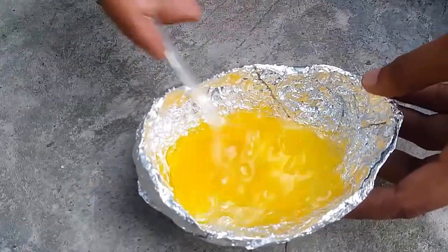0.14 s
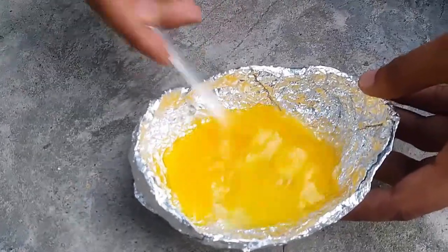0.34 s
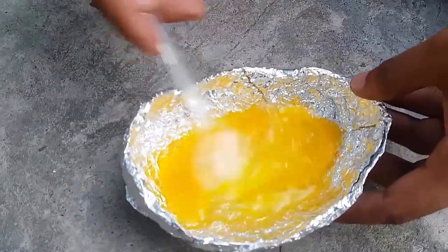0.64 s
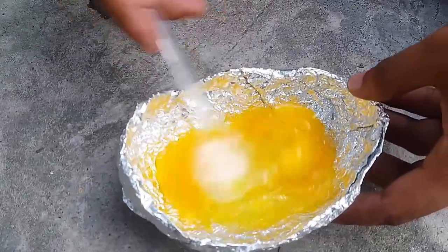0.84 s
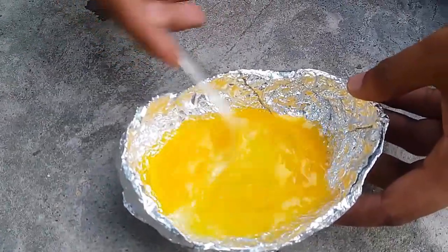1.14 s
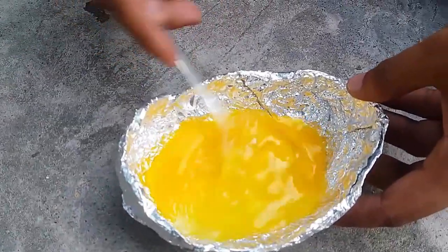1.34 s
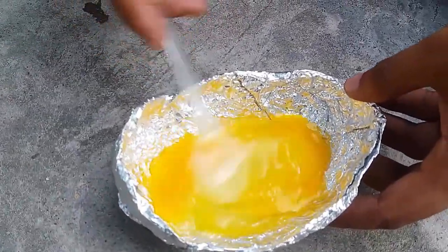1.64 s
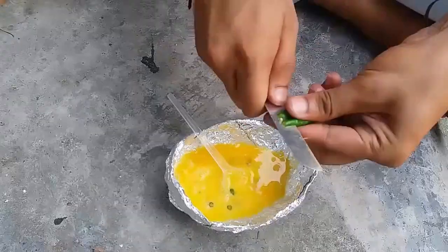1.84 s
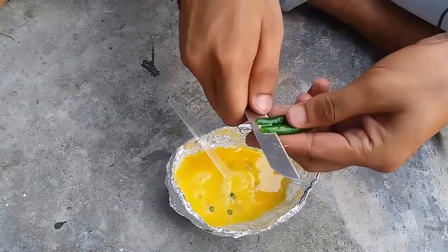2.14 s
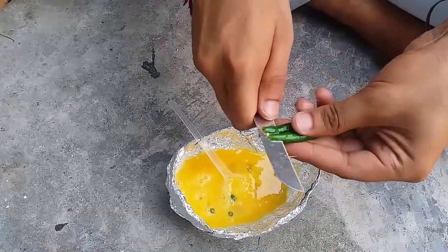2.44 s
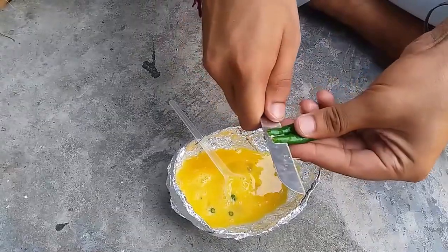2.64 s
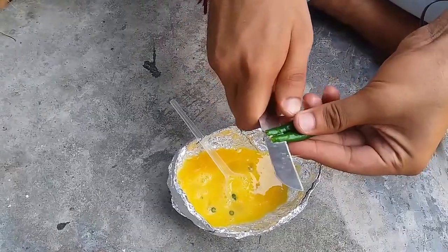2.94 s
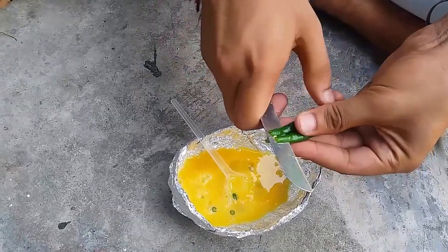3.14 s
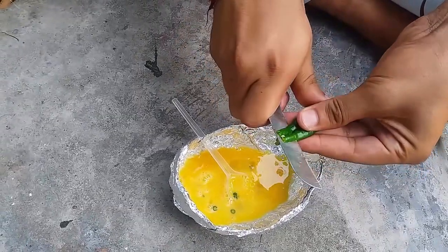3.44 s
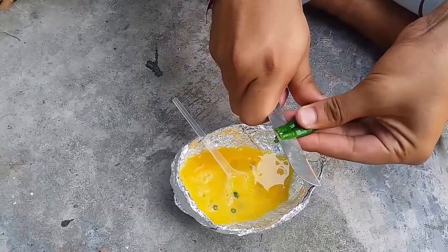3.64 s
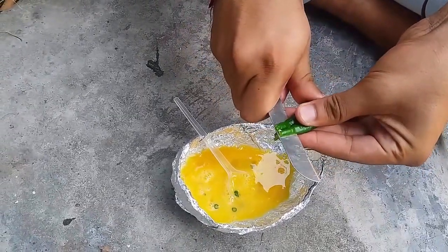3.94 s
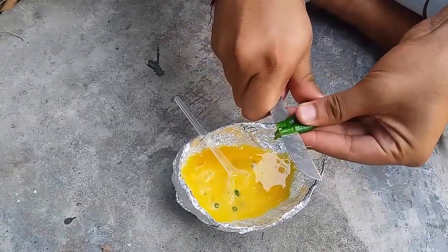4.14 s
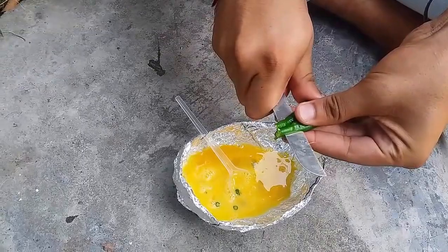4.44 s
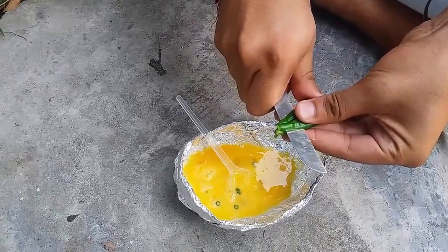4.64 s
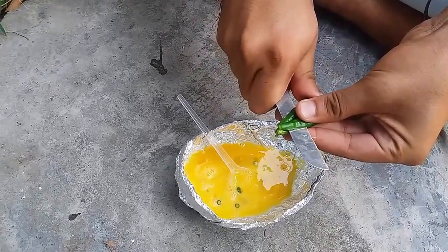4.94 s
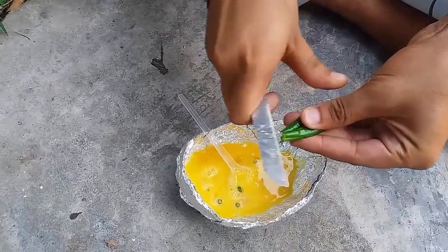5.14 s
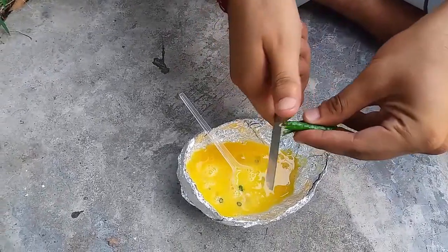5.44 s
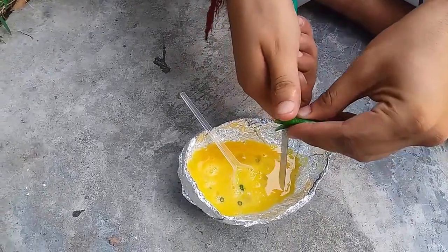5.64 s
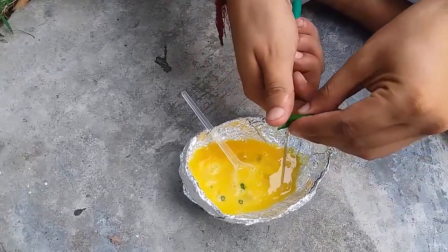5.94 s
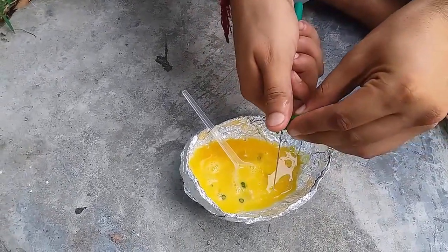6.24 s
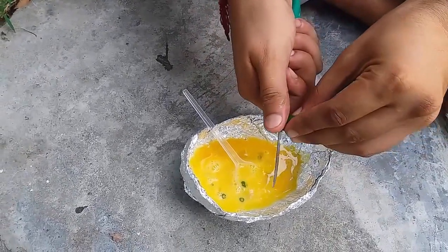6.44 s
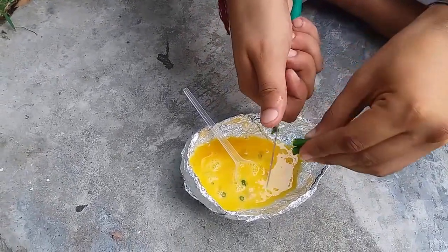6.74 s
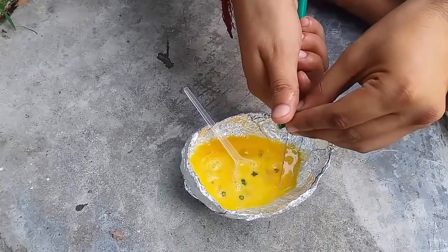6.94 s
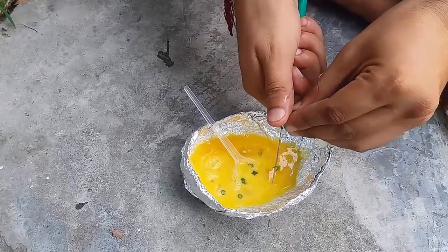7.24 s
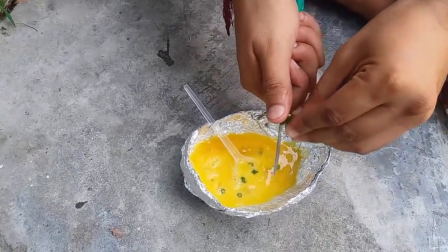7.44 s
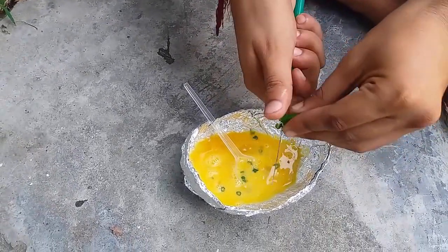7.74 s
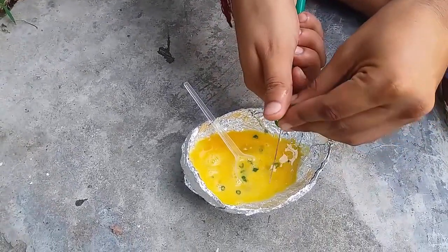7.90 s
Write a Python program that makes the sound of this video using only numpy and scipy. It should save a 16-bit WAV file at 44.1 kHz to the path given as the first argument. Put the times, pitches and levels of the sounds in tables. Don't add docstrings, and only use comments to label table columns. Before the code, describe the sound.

A plastic fork beats eggs in a crinkly foil bowl, drops with a sharp clatter, then faint knife snips over quiet outdoor birds and engine thump.

```python
import sys
import numpy as np
from scipy import signal
from scipy.io import wavfile
from scipy.ndimage import uniform_filter1d

SR = 44100
rng = np.random.default_rng(int(sys.argv[2]) if len(sys.argv) > 2 else 0)


def invert_db(x):
    u = np.asarray(x, float) / 20
    return 10 ** u


def wav_record(signal):
    frames = np.transpose(np.atleast_2d(signal))
    bounded = np.clip(frames, -1, 1)
    quanta = np.round(bounded * 32767).astype(np.int16)
    wavfile.write(sys.argv[1], SR, quanta)


N = 355887

# hz, level_db (per Hz)
WET_FOIL = [(1470, -42.5), (2600, 1), (3700, -2.5), (5270, 3), (6400, -3.5), (8000, -7), (11500, -17.5),
            (16000, -26)]
# hz, level_db (per Hz)
BLADE_COLOUR = [(1470, -43), (2500, -11.5), (4200, -10), (6010, -6.5), (8940, -15), (13200, -19.5),
                (16000, -24)]


def evened(x):
    return x / np.sqrt(np.mean(x ** 2) + 1e-20)


def read(points, hz):
    f, value = np.transpose(points)
    return np.interp(np.log(hz + 1), np.log(f + 1), value)


def add(mix, s, sound):
    part = mix[round(s * SR):][:len(sound)]
    part += sound[:len(part)]


def drift(per_s, size=N):
    knots = rng.standard_normal(size // 64 + 2)
    smooth = signal.lfilter([1], [1, -np.exp(-2 * np.pi * per_s * 64 / SR)], knots)
    smooth = uniform_filter1d(smooth, size=5)
    return evened(np.interp(np.arange(size) / 64, np.arange(len(knots)), smooth))


def band(hz, width, size=N):
    sos = signal.butter(3, [hz - width / 2, hz + width / 2], "band", fs=SR, output="sos")
    return evened(signal.sosfilt(sos, rng.standard_normal(size)))


def resonate(x, hz, width):
    turn = np.exp(2j * np.pi * hz * np.arange(len(x)) / SR)
    r = np.exp(-np.pi * width / SR)
    return 2 * (turn * signal.lfilter([1 - r], [1, -r], x / turn)).real


def causal(points):
    gain = np.log(invert_db(read(points, abs(np.fft.fftfreq(2048, 1 / SR)))))
    return np.fft.ifft(np.exp(np.conj(signal.hilbert(gain)))).real[:1024]


def echoes(x, t60, wet_db):
    t = np.arange(SR // 2) / SR
    taps = rng.choice([-1., 1.], len(t)) * (rng.random(len(t)) < .05)
    taps = taps * invert_db(-60 * t / t60)
    return x + invert_db(wet_db) * signal.fftconvolve(x, taps / np.linalg.norm(taps))[:N]


def bend(length, hz, ends, at=.5):
    u = np.linspace(0, 1, int(length * SR)) ** (np.log(.5) / np.log(at))
    curve = np.polyfit([0, .5, 1], [ends[0], 1, ends[1]], deg=2)
    return hz * np.polyval(curve, u)


def whistle(length, hz, db, ends):
    hz = bend(length, hz, ends)
    hz = hz * (1 + .009 * drift(50, size=len(hz)))
    hoarse = .95 + .4 * band(160, 280, size=len(hz))
    flutter = invert_db(db + 2 * drift(50, size=len(hz))) * hoarse
    return flutter * np.sin(2 * np.pi * np.cumsum(hz) / SR) * signal.windows.tukey(len(hz), .6)


def crackle(rows, colour, ring, ring_width, tail_db, tail_s, rise=0.22):
    out, t, body = np.zeros(N), np.arange(3000) / SR, causal(colour)
    dull = signal.butter(2, [600, 3000], "band", fs=SR, output="sos")
    draws = rng.standard_normal((len(rows), 2, len(t)))
    for (s, db, hz, dull_db, length), (grain, clumps) in zip(rows, draws):
        length = np.clip(length, .0003, .03)
        clump_db = 4.8 * np.minimum(t / (0.26 * length), 1)
        snaps = grain * invert_db(clump_db * evened(uniform_filter1d(clumps, size=30)))
        snaps *= np.minimum(t / (rise * length), 1)
        snaps *= np.exp(-t / length) + invert_db(tail_db) * np.exp(-t / tail_s)
        sheet = signal.fftconvolve(snaps, body)[:len(t)]
        bright = evened(sheet) + ring * evened(resonate(sheet, hz, ring_width))
        thud = signal.sosfilt(dull, snaps)
        add(out, s, invert_db(db) * (bright / abs(bright).max() + invert_db(dull_db) * thud / abs(thud).max()))
    return out


def short_rings(rows, climb):
    out, t = np.zeros(N), np.arange(4000) / SR
    for s, db, hz, t60 in rows:
        ring = np.sin(2 * np.pi * hz * (t + climb * t ** 2))
        ring = ring * (1 + .2 * band(300, 500, size=len(t)))
        add(out, s, invert_db(db - 60 * t / max(t60, .003)) * np.minimum(t / 0.00089, 1) * ring)
    return out


def air():
    # hz, level_db (per Hz)
    air_colour = [(20, -35), (36, -35), (48, -4.5), (108, -3), (182, -7), (266, -11), (650, -22),
                  (1300, -28.5), (2100, -28.5), (3600, -31.5), (6400, -36), (9000, -36.5), (15700, -40),
                  (16000, -58)]
    # start_s, level_db
    swell = [
        (0.0, -60),
        (4.23, -63.5),
        (8.07, -59.5),
    ]
    frames, hz = N // 512 + 5, np.fft.rfftfreq(2048, 1 / SR)
    a, b, patches = rng.standard_normal((frames, 1025, 3)).T
    patches = uniform_filter1d(patches, size=20, axis=0)
    patches = evened(uniform_filter1d(patches, size=8, axis=1))
    s, db = np.transpose(swell)
    swell_db = np.interp(np.arange(frames) * 512 / SR, s, db - db.mean())
    traffic_share = np.exp(-np.log((hz + 1) / 600) ** 2 / 3.8)[:, None]
    level_db = read(air_colour, hz)[:, None] + 1.18 * patches + traffic_share * swell_db
    wash = signal.istft((a + 1j * b) * invert_db(level_db), nperseg=2048, noverlap=1536)[1][:N]
    return invert_db(-53.5) * evened(wash)


def engine():
    # order, level_db
    orders = [(4, -78.5), (5, -77), (6, -73), (7, -61.5), (8, -56), (9, -61.5), (10, -62.5), (11, -57.5),
              (12, -69.5), (13, -65.5), (14, -61.5), (15, -63.5), (16, -61), (17, -68.5), (19, -70.5)]
    turns = np.cumsum(11.45 * (1 + 0.0021 * drift(0.25))) / SR
    lag = np.pi / 2
    out = np.zeros(N)
    for k, db in orders:
        waver = 0.98 * drift(0.58)
        level = np.sqrt(2) * invert_db(db + 1.26 * drift(3.2))
        out += level * np.cos(2 * np.pi * k * turns + lag * (k % 2) + waver)
    return out


def chorus():
    # start_s, insects_db, birds_db
    busy = [(0, -65, -60), (.43, -66, -67), (.85, -71, -64), (1.24, -59, -63), (1.57, -60, -66),
            (1.89, -67, -67.5), (2.3, -69, -71), (2.95, -63.5, -67.5), (3.3, -75, -73.5), (3.7, -61, -66),
            (4.14, -67, -65), (4.6, -62, -70), (5.03, -65, -75), (5.4, -58, -66), (5.75, -64, -73),
            (6.8, -65, -70), (7.3, -63.5, -78), (8.07, -66, -69)]
    # start_s, level_db
    high_insects = [(0.0, -79), (0.83, -78), (1.24, -74), (1.64, -68), (2.27, -77), (2.9, -67), (3.14, -77),
                    (3.42, -77), (3.73, -68), (4.2, -72), (4.7, -66), (5.17, -72), (6.36, -72), (6.68, -68),
                    (7.08, -73), (7.42, -74), (7.57, -67), (8.07, -74)]
    # centre_hz, width_hz
    bands = [(5050, 1080), (7550, 500), (3050, 440)]
    t, (s, insects_db, birds_db) = np.arange(N) / SR, np.transpose(busy)
    insects_db, birds_db = np.interp(t, s, insects_db), np.interp(t, s, birds_db)
    high_db = np.interp(t, *np.transpose(high_insects)) - 2.5
    out = np.zeros(N)
    for db, (hz, width) in zip((insects_db, high_db, birds_db), bands):
        for place in (-1, 0, 1):
            strand = band(hz + place * width * .4, width * .45)
            out += strand * invert_db(db - 3.5 - 4 * abs(place) + 2.4 * drift(10))
    return out


def songbirds():
    # start_s, length_s, middle_hz, level_db
    held = [(0, .025, 2365, -51), (.065, .045, 3230, -54), (2.238, 0.045, 1490, -66),
            (2.478, 0.072, 3040, -57), (4.074, 0.082, 3020, -51.5), (4.25, 0.089, 2838, -53.5),
            (5.09, 0.23, 2930, -62), (5.3, .15, 2900, -66.5), (5.03, 0.036, 3000, -60),
            (1.34, .04, 3050, -61), (7.91, .1, 3150, -62), (2.92, .12, 3060, -65), (3.04, .04, 3430, -65),
            (4.6, .06, 2856, -62.5), (5.88, 0.11, 2980, -65), (5.83, 0.08, 3150, -57),
            (5.72, .1, 3050, -63), (.08, .02, 3200, -53), (5.849, 0.06, 1490, -58), (6.86, 0.057, 266, -51),
            (6.948, 0.036, 2780, -63), (6.17, .08, 1290, -70), (7.07, 0.2, 1945, -69.5),
            (7.7, 0.28, 1580, -69.5), (1.83, .07, 2550, -65)]
    # start_s, length_s, middle_hz, level_db
    rising = [(.259, 0.047, 3110, -51.5), (.91, 0.03, 3100, -58), (2.31, 0.045, 2790, -56),
              (3.76, 0.038, 2740, -55), (3.993, 0.055, 2750, -50.5), (4.235, 0.04, 2400, -57),
              (4.739, 0.091, 2846, -62), (5.062, 0.047, 2645, -54), (7.908, 0.18, 2940, -64)]
    # start_s, length_s, middle_hz, level_db
    falling = [(.472, .087, 2640, -55), (1.116, 0.11, 2860, -56.5), (2.5, .03, 2700, -57),
               (2.639, 0.048, 2480, -56.5), (3.808, 0.053, 2700, -57), (3.918, 0.049, 2974, -51.5),
               (4.092, 0.031, 2330, -58), (4.89, .12, 2430, -63), (5.245, 0.051, 2706, -52.5),
               (5.408, 0.041, 2500, -58.5), (6.49, 0.072, 3150, -65)]
    # start_s, length_s, middle_hz, level_db
    arched = [
        (2.68, 0.069, 2425, -54.5),
        (4.13, 0.072, 2406, -54.5),
        (5.445, 0.084, 2350, -55),
    ]
    shapes = ((held, (1, 1)), (rising, (.9, 1.04)), (falling, (0.98, 0.893)), (arched, (0.8, 0.75)))
    out = np.zeros(N)
    for notes, ends in shapes:
        for s, length, hz, db in notes:
            add(out, s, whistle(length, hz, db, ends))
    return out


def scrape():
    count = int(1.56 * SR)
    t = np.arange(count) / SR
    often = 400 / SR * invert_db(4.4 * drift(20, size=count))
    often = often * invert_db(2.5 * np.cos(2 * np.pi * (t - 0.11) / .195))
    snaps = (rng.random(count) < often) * invert_db(3.6 * rng.standard_normal(count))
    bursts = signal.lfilter([1], [1, -np.exp(-1 / 40)], snaps) * rng.standard_normal(count)
    sound = signal.fftconvolve(bursts, causal(WET_FOIL))
    return np.pad(invert_db(-63.5) * evened(sound), (0, N - len(sound)))


def whisk():
    # start_s, peak_db, crease_hz, dull_db (re peak)
    strikes = [(0.0363, -37.5, 4440, -17), (0.059, -24.5, 8100, -36), (0.1028, -22, 5300, -11.5),
               (0.1278, -34, 4460, -8), (0.305, -29.5, 4900, -18), (0.3139, -28, 6600, -14),
               (0.3178, -28, 4700, -1), (0.446, -32, 7450, -17), (0.4697, -26.5, 5100, -18),
               (0.614, -33.5, 4900, -18), (0.6439, -30.5, 4960, -8), (0.655, -32, 5500, -6),
               (0.6714, -39.5, 4000, 7.5), (0.8355, -33, 7600, -6), (0.8387, -21, 5700, -10.5),
               (0.8705, -27.5, 7000, -4.5), (0.96, -50, 7600, -12), (0.1973, -41, 5600, 5),
               (0.268, -44, 6000, -6), (0.385, -46, 6100, -20), (0.3095, -29, 5600, -17),
               (0.638, -42, 6500, -10), (0.8735, -27, 5300, -8), (1.2225, -25.5, 6500, -14),
               (1.221, -25, 6660, -15), (1.4179, -38, 5050, -9), (1.4253, -23, 5700, -17),
               (7.661, -47, 4600, 8)]
    # start_s, peak_db, crease_hz, dull_db (re peak)
    slides = [(0.033, -49, 5000, 1), (0.098, -30, 6000, -9), (.124, -32.5, 5500, -9),
              (0.106, -33, 5400, -8), (0.113, -36, 7000, 1), (0.139, -40, 4600, -9),
              (0.1927, -45, 5000, -2), (0.334, -41, 5000, -20), (0.504, -44, 5000, -3),
              (0.692, -36.5, 5900, -7), (0.699, -47, 6000, -14), (0.7134, -46, 5600, -4),
              (0.865, -28.5, 6500, -9), (0.882, -49, 5600, 0), (0.893, -36, 5600, -6),
              (0.901, -42, 5600, 2.5), (1.081, -43.5, 5000, -3.5), (1.269, -40.5, 5000, 5),
              (1.28, -35, 5600, -5), (1.289, -38, 6200, -12), (1.431, -29.5, 5500, -8),
              (1.438, -38, 8000, -18), (1.446, -37.5, 5600, -11), (1.459, -35, 5600, -8),
              (1.462, -31, 6100, -13), (1.483, -42, 5400, -8), (1.491, -48, 5000, -3),
              (1.505, -46, 5800, -3)]
    blows = [(*row, 0.0018 * invert_db(-0.045 * (row[1] + 23))) for row in strikes]
    slips = [(*row, 0.0035) for row in slides]
    struck = crackle(blows, WET_FOIL, ring=1.0, ring_width=530, tail_db=-30.5, tail_s=0.02)
    slid = crackle(slips, WET_FOIL, ring=0.74, ring_width=1600, tail_db=-26.5, tail_s=0.054, rise=1.2)
    return struck + slid


def egg_pops():
    # start_s, peak_db, pitch_hz, t60_s
    pockets = [(0.058, -39, 1560, 0.028), (0.08, -44, 1204, 0.042), (0.116, -31, 1770, 0.013),
               (1.037, -35.5, 1600, 0.016), (1.028, -43, 2270, 0.018), (0.131, -44, 1470, 0.076),
               (0.305, -32.5, 1650, 0.054), (0.469, -35.5, 1633, 0.049), (0.555, -44.5, 970, 0.026),
               (0.658, -33, 1850, 0.019), (0.791, -38, 1780, 0.024), (0.841, -20.5, 2370, 0.011),
               (0.866, -44, 1940, 0.04), (1.2252, -24, 1845, 0.02), (1.221, -36, 1700, .03),
               (1.271, -39, 647, 0.042), (1.307, -48, 2120, 0.1), (1.418, -26.5, 1830, 0.017),
               (1.6737, -18.5, 1540, 0.017), (1.674, -31, 710, 0.027), (7.339, -47, 786, 0.032),
               (0.307, -47, 715, 0.026), (0.626, -50, 1400, .02), (0.645, -45, 750, .03),
               (0.868, -44, 696, 0.032), (0.876, -43, 2160, 0.066), (1.236, -43, 2040, 0.046),
               (1.427, -41, 606, 0.023), (1.706, -48, 327, .04), (7.661, -41, 1670, 0.024),
               (1.28, -46, 2920, .03), (1.731, -33, 926, .025), (1.746, -38, 3750, .03)]
    return short_rings(pockets, climb=2)


def crease_rings():
    # start_s, peak_db, pitch_hz, t60_s
    creases = [(.0592, -32, 7900, .017), (.0595, -31, 5400, .02), (.4475, -37, 5000, .02),
               (.325, -44, 3100, .04), (1.2255, -36, 5900, .02), (1.433, -38, 8000, .02),
               (1.4395, -37, 8000, .015), (1.435, -35, 5400, .025), (1.674, -20, 3280, .016),
               (1.674, -12, 5050, .018), (1.6738, -12, 8050, .014), (1.674, -23, 10100, .01),
               (1.7312, -17, 4810, .016), (1.7312, -19, 5710, .014), (1.7312, -22, 3800, .016),
               (1.7312, -27, 8290, .012)]
    return short_rings(creases, climb=0)


def ticks():
    # start_s, peak_db, ring_hz
    snaps = [(.4697, -24.5, 5100), (0.6561, -27.5, 7600), (0.8352, -24.5, 7500), (.8692, -32, 5600),
             (1.0245, -29.5, 5300), (1.0287, -37, 5500), (1.0318, -32, 5600), (1.035, -34, 6000),
             (1.038, -25.5, 6000), (1.041, -37, 5200), (4.31, -24.5, 6300), (4.3122, -26.5, 6200),
             (7.3352, -38, 6000), (7.3397, -30.5, 5960), (7.351, -41, 6000), (7.3555, -41, 8500),
             (7.439, -47, 5500), (7.5097, -27.5, 5760), (.7008, -34, 6000), (.4935, -41, 4800),
             (6.7048, -33.5, 6600), (2.8625, -37, 8000), (7.7295, -39.5, 6000), (6.458, -49, 8000)]
    rows = [(*row, -17.5, 0.00057) for row in snaps]
    return crackle(rows, BLADE_COLOUR, ring=1.0, ring_width=900, tail_db=-23.5, tail_s=0.0052, rise=0.51)


def throbbing_insect():
    # start_s, end_s, beat_offset_rad, level_db
    bouts = [(0.256, 0.64, 3.5, -66.5), (1.096, 1.594, 2.5, -64.5), (2.119, 2.75, -0.1, -65),
             (2.785, 3.06, 1, -68.5), (3.101, 3.576, 1.6, -63.5), (4.946, 5.35, -1, -67),
             (5.639, 6.137, 3.5, -61.5), (6.539, 7.135, 2.5, -62), (7.542, 8.12, 2, -63)]
    t = np.arange(N) / SR
    stumble = .3 * drift(6)
    beats = np.zeros(N)
    for start, end, offset, db in bouts:
        throb_db = 5 * np.cos(2 * np.pi * 13.4 * (t - start) + offset + stumble)
        fade = np.clip(np.minimum(t - start, end - t) / 0.065, 0, 1)
        beats += invert_db(db + throb_db) * fade
    return beats * (band(4620, 480) + .3 * band(5170, 450)) * invert_db(1.8 * drift(3.1))


def rustles():
    # start_s, length_s, centre_hz, width_hz, level_db
    swells = [
        (0.551, 0.23, 79, 40, -53),
        (1.663, 0.21, 373, 400, -63),
        (1.75, 0.2, 2700, 1500, -63),
        (4.3, 0.4, 3400, 1800, -65.5),
        (5.1, .6, 4150, 500, -68),
        (6.223, 0.18, 3300, 1000, -65),
        (7.098, 0.17, 52.5, 29.3, -61),
        (7.447, 0.38, 1920, 900, -66),
        (1.745, .04, 3600, 900, -56),
        (7.891, 0.17, 2540, 1400, -62.5),
    ]
    out = np.zeros(N)
    for s, length, hz, width, db in swells:
        count = int(length * SR)
        grain = invert_db(db + 3 * drift(22, size=count))
        add(out, s, band(hz, width, size=count) * grain * signal.windows.tukey(count, .4))
    return out


def fork_drop():
    # start_s, peak_db, crease_hz, dull_db (re peak), crackle_s
    bounces = [(1.6222, -32.5, 4620, -14, 0.0017), (1.6268, -26, 8200, -17, 0.0014),
               (1.6371, -15, 5650, -15, 0.0014), (1.648, -37, 6600, -17, .004),
               (1.66, -35.5, 5900, -9.5, 0.0059), (1.722, -36, 3400, -10, 0.0033),
               (1.759, -50, 6000, -20, .002), (1.6737, -5.5, 7400, -16, 0.0014),
               (1.6768, -10.5, 5600, -23.5, 0.0015), (1.69, -27, 5200, -29, 0.0087),
               (1.6985, -26, 4700, -34, 0.0012), (1.707, -31, 5000, -21, 0.0079),
               (1.7308, -9.5, 4660, -14, 0.0021), (1.734, -9.5, 4900, -13, 0.00066),
               (1.745, -39, 3500, -34, 0.014)]
    # hz, level_db (per Hz)
    dry_foil = [(410, -45.5), (700, -36), (910, -30), (1150, -14), (3410, -2.5), (3790, -6.5), (5920, -2),
                (7010, -4.5), (8310, -9.5), (16000, -24)]
    return crackle(bounces, dry_foil, ring=1.0, ring_width=860, tail_db=-84, tail_s=0.0097)


def knife_snips():
    # start_s, peak_db, ring_hz
    cuts = [(1.964, -38, 8300), (1.9942, -38.5, 7550), (2.8611, -32, 4740), (3.095, -45.5, 5630),
            (3.5094, -38.5, 7330), (2.0, -41.5, 7000), (3.94, -45, 7400), (4.0677, -44, 5780),
            (4.1186, -36, 7800), (4.162, -37.5, 5930), (4.258, -40, 5800), (4.1473, -44, 7000),
            (1.97, -38, 6000), (4.2874, -46, 5900), (4.3065, -38, 6500), (4.315, -39, 6400),
            (4.321, -35, 6000), (4.33, -45, 7200), (4.338, -41, 7000), (4.343, -47, 6400),
            (4.361, -45, 6600), (4.385, -51, 6000), (4.4606, -47, 7400), (4.6132, -46, 6400),
            (4.6781, -50, 7000), (4.8088, -46, 5900), (4.9, -47, 7200), (5.0542, -45.5, 6500),
            (5.1891, -47, 6100), (6.2886, -41, 6000), (6.6673, -48, 6000), (7.459, -43, 5600),
            (7.4889, -45, 5600), (4.402, -43, 7600), (4.538, -37.5, 5870), (4.584, -43, 5750),
            (4.7488, -39.5, 7560), (4.881, -44, 5780), (5.36, -41, 5800), (6.31, -39, 5800),
            (6.3847, -35.5, 5700), (6.506, -42, 6500), (6.698, -39, 6000), (6.702, -40, 6600),
            (6.7995, -50, 6500), (7.342, -33, 5000), (7.383, -50, 7200), (7.635, -50, 5600),
            (7.951, -52, 6000), (7.4455, -44, 5760), (7.5393, -31.5, 6200)]
    rows = [(*row, -14.5, 0.00124) for row in cuts]
    return crackle(rows, BLADE_COLOUR, ring=1.0, ring_width=1400, tail_db=-27.5, tail_s=0.022, rise=0.85)


def chirps():
    # start_s, level_db
    calls = [(2.05, -56.5), (2.3, -59), (2.409, -57.5), (2.52, -56), (2.7, -56), (3.041, -59), (3.33, -60),
             (3.44, -56), (3.668, -54), (3.942, -54), (4.179, -60), (4.29, -52.5), (4.41, -56.5),
             (6.3, -60), (6.6, -59), (7.7, -56)]
    out, u = np.zeros(N), np.linspace(0, 1, 2400)
    sweep = np.sin(2 * np.pi * np.cumsum(2700 + 1000 * u) / SR)
    for s, db in calls:
        rough = band(537, 1070, size=len(u))
        add(out, s - .015, invert_db(db) * sweep * rough * np.hanning(len(u)))
    return out


def caws():
    # start_s, length_s, top_hz, level_db, squawk_db
    calls = [
        (2.255, .225, 600, -67.5, -59),
        (2.83, .18, 570, -66.5, -56),
        (5.89, .21, 585, -68.5, -57),
    ]
    # hz, level_db
    throat = [(600, -22), (1150, 4.5), (1750, -1), (2300, -19)]
    out, squawk_s = np.zeros(N), 0.0582
    for s, length, top_hz, db, squawk_db in calls:
        hz = bend(length, top_hz, (.92, .88), at=0.33)
        count = len(hz)
        turns = np.cumsum(hz * (1 + 0.0075 * drift(27.5, size=count))) / SR
        voice = sum(invert_db(read(throat, k * hz)) * np.sin(2 * np.pi * k * turns) for k in range(1, 5))
        rasp = band(1570, 390, size=count)
        level = invert_db(db + 1.6 * drift(18, size=count)) * signal.windows.tukey(count, .3)
        add(out, s, level * (evened(voice) + 0.4 * rasp))
        add(out, s + length - squawk_s / 2, whistle(squawk_s, 1480, squawk_db, (1.13, .92)))
    return out


def dove():
    # start_s, pitch_hz, level_db
    coo = [
        (5.53, 545, -74),
        (5.75, 522, -64),
        (5.9, 495, -69),
        (6.07, 490, -63),
        (6.11, 500, -74),
        (6.15, 520, -62),
        (6.22, 490, -67),
        (6.45, 490, -66),
        (6.85, 470, -67),
    ]
    out = np.zeros(N)
    s, path_hz, path_db = np.transpose(coo)
    t = np.arange(s[0], s[-1], 1 / SR)
    hz = np.interp(t, s, path_hz) * (1 + .02 * drift(6, size=len(t)))
    level = invert_db(np.interp(t, s, path_db) + 1.5 + 2 * drift(8, size=len(t)))
    add(out, s[0], level * np.sin(2 * np.pi * np.cumsum(hz) / SR))
    return out


def scene():
    near = whisk() + scrape() + egg_pops() + crease_rings() + ticks() + fork_drop() + knife_snips()
    birds = songbirds() + chirps() + caws() + dove()
    far = air() + engine() + chorus() + throbbing_insect() + echoes(birds, t60=0.4, wet_db=-7)
    return (echoes(near, t60=0.032, wet_db=-10) + rustles() + far)[None]


def low_pass(x):
    return signal.sosfilt(signal.butter(12, 16790, fs=SR, output="sos"), x)


def record(dry):
    edge = signal.firwin(255, 16300, fs=SR)[None]
    wet = signal.oaconvolve(dry, edge, "same") - .0006
    return low_pass(wet)


dry = scene()
out = record(dry)
wav_record(out)
```